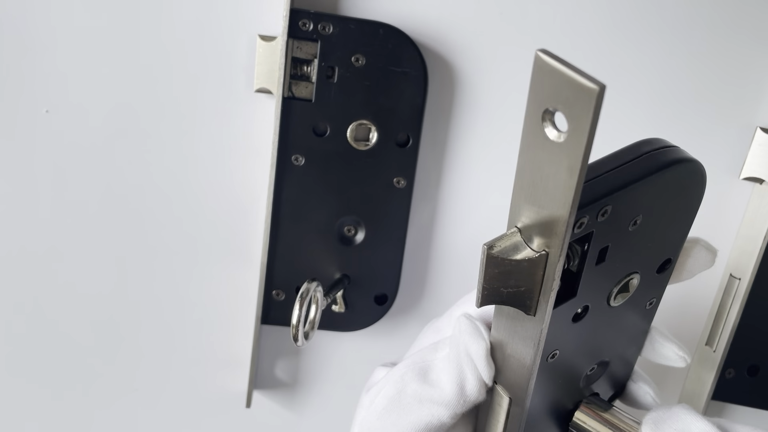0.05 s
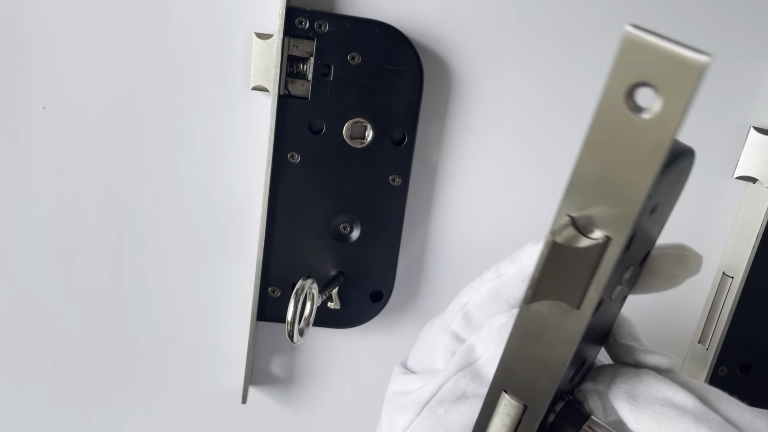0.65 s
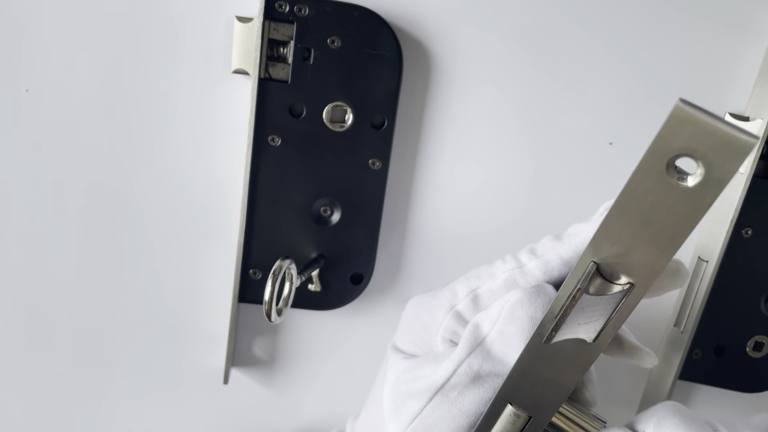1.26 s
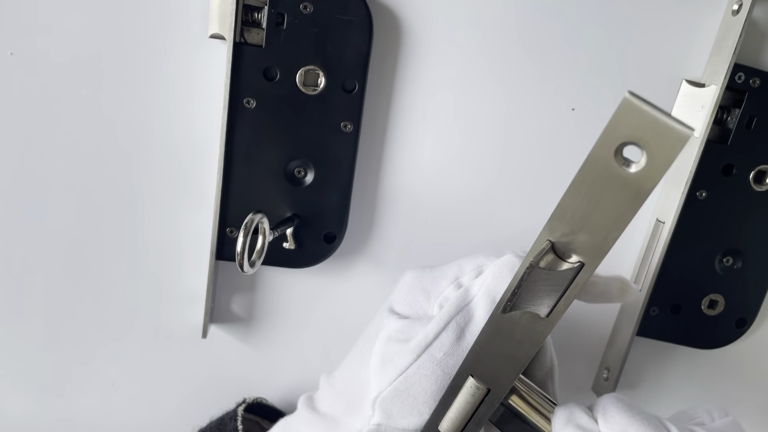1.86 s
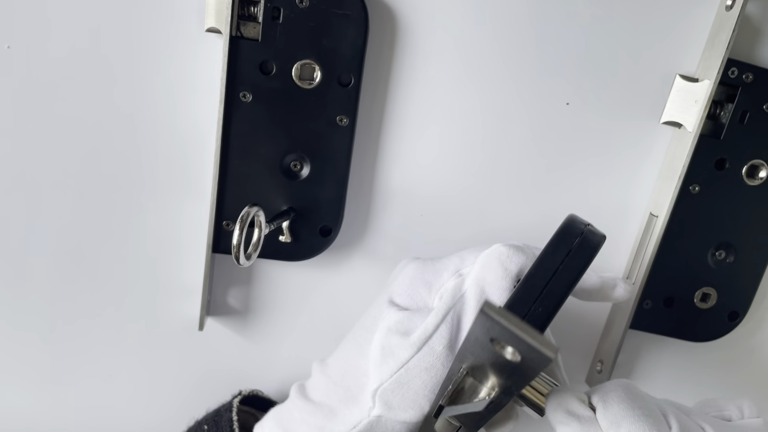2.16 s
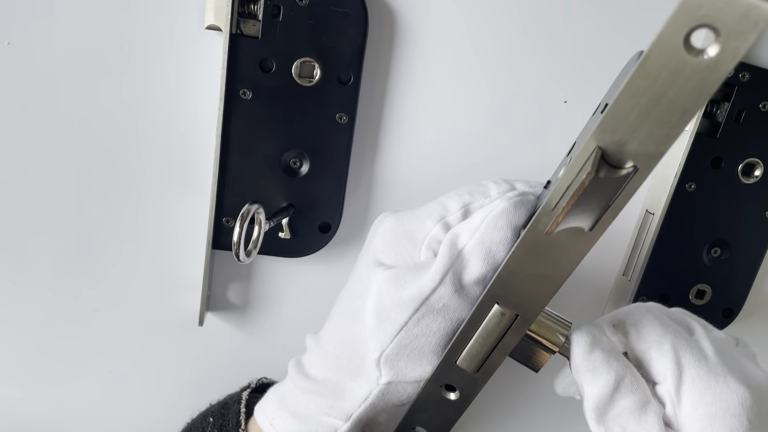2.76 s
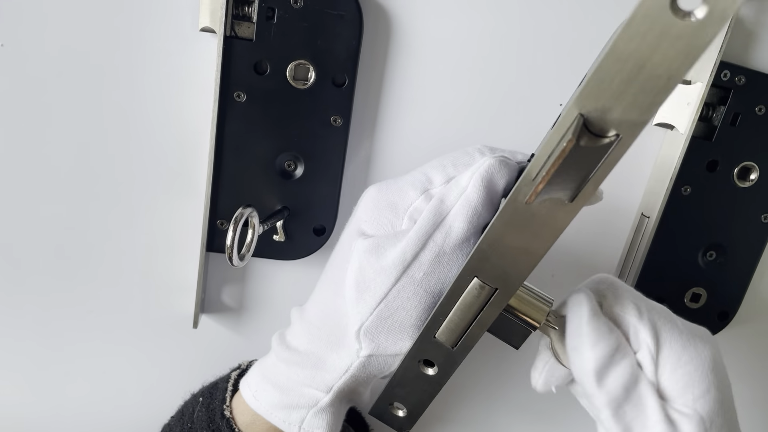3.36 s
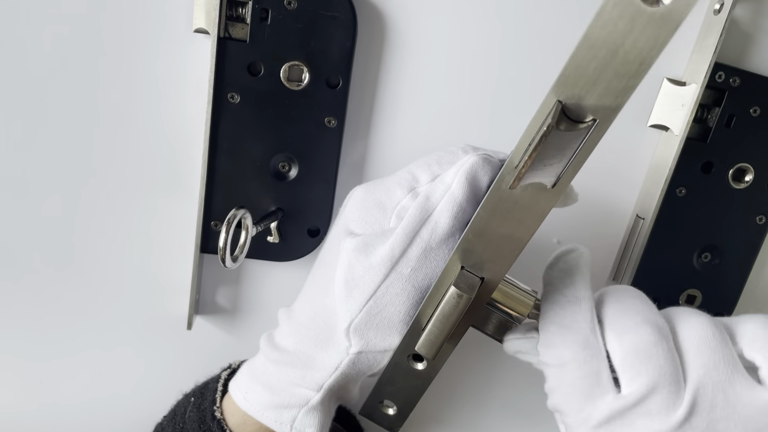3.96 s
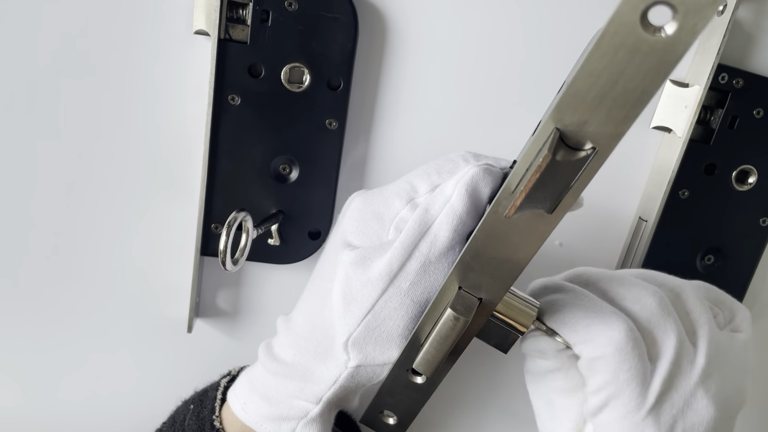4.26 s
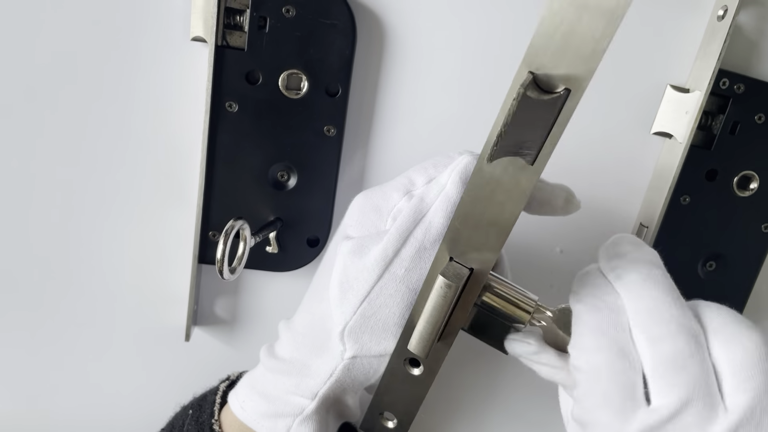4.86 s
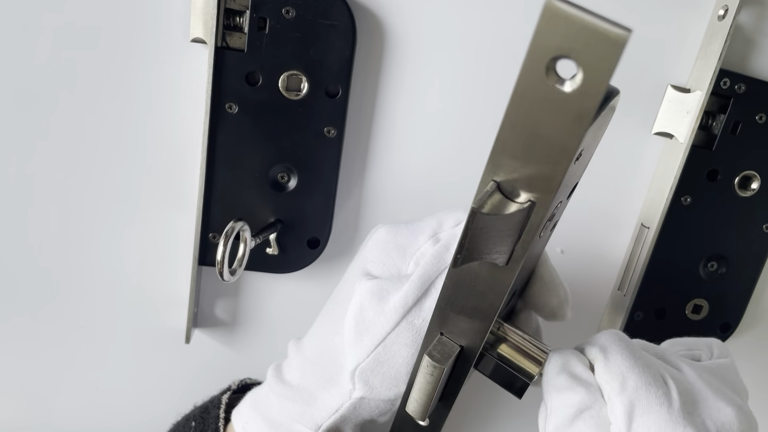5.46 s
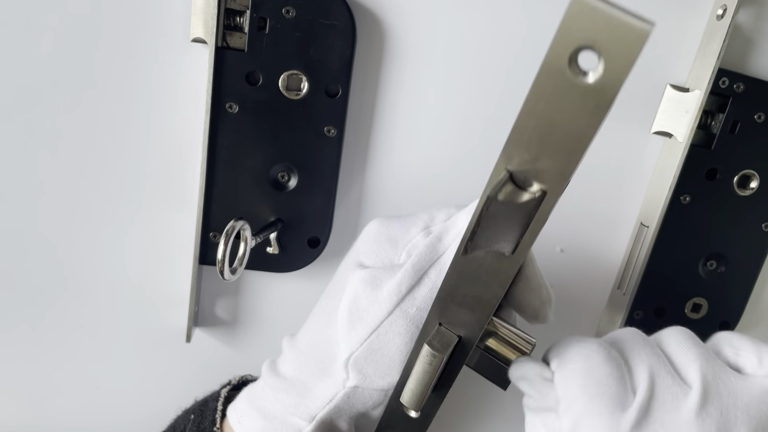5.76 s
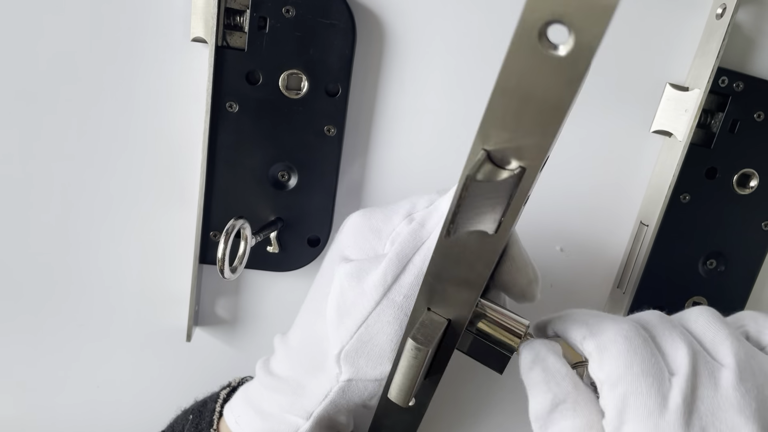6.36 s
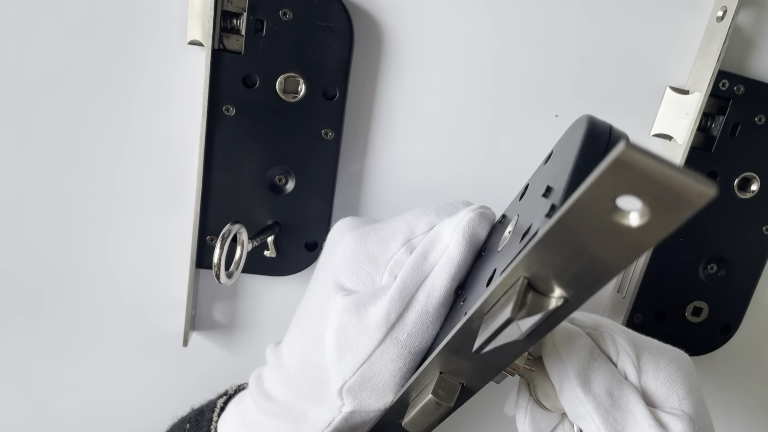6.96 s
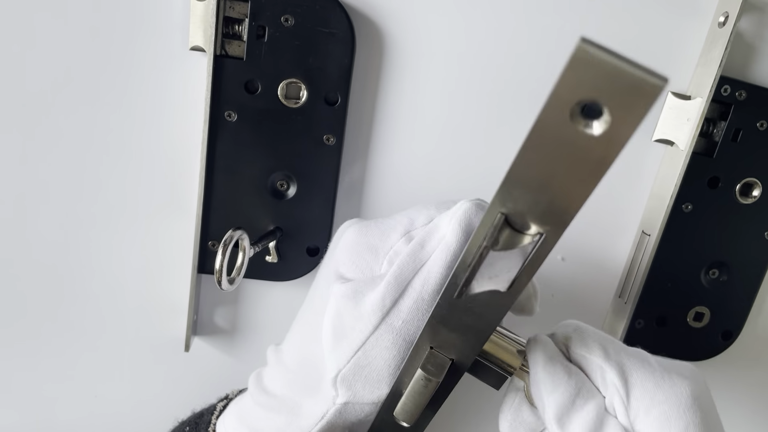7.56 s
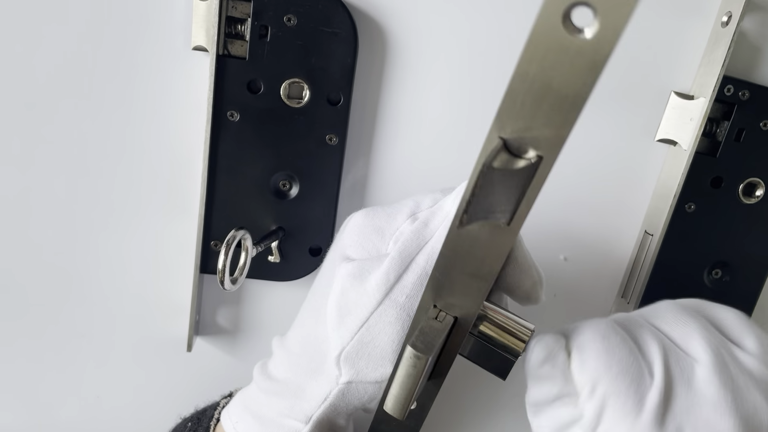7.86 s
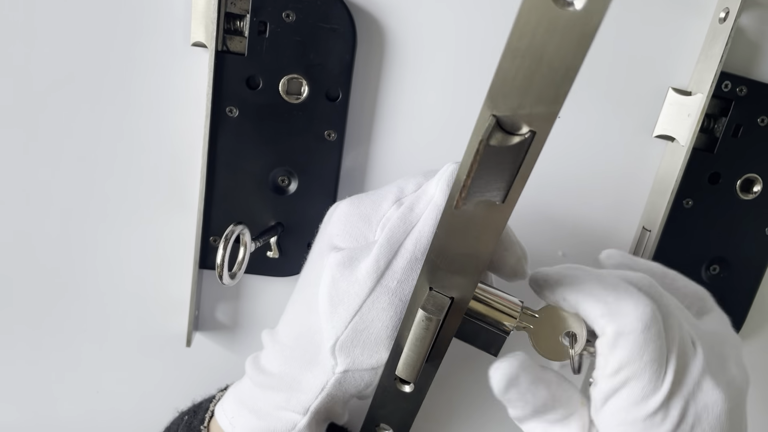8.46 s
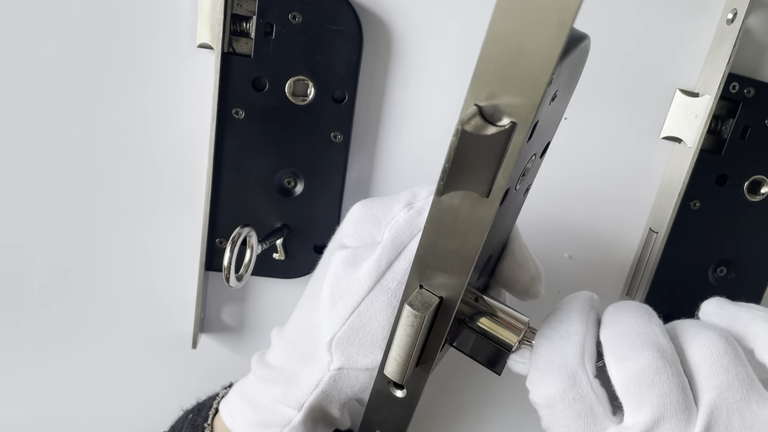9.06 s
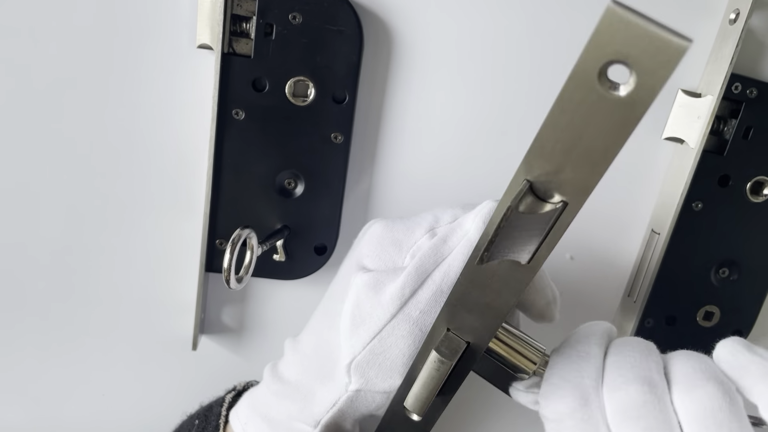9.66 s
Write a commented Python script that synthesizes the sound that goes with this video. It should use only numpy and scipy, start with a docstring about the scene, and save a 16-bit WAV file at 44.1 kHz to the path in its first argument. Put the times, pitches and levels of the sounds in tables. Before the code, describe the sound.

A key turns back and forth in a steel door lock, with sharp bolt clacks, lever ticks, small key jingles and glove rustle.

```python
"""Over a low room rumble, a faint hum and a sinking drone, cotton gloves rub on a steel door lock.
The lock clicks and clacks as a key is fitted, and the spare keys jingle against each other.
The key turns back and forth: metal scrapes, levers tick, the bolt slams into its stop and the case
rings. Some slams also knock dully through the table. The table and the small room add echoes."""
import sys
import numpy as np
from scipy import signal
from scipy.fft import rfft, irfft, next_fast_len
from scipy.io import wavfile
from scipy.ndimage import uniform_filter1d

SR = 44100
rng = np.random.default_rng(int(sys.argv[2]) if len(sys.argv) > 2 else 0)


def generate_wav(sig):
    """Save sig (samples, or channels by samples) to the path in sys.argv[1] as 16-bit PCM at SR."""
    pcm = np.round(np.clip(np.atleast_2d(sig).T, -1, 1) * 32767).astype(np.int16)
    wavfile.write(sys.argv[1], SR, pcm)


N = 428211
TIME = np.arange(N) / SR

# Levels in the tables are relative. A "colour" says how strong each pitch is, from bass to treble.
# The room's rumble. Each row: pitch in Hz, level in dB.
RUMBLE_COLOUR = [(20, -18.5), (32, -12), (48, 5), (100, 0), (140, 3), (235, -6.5), (285, -10), (600, -13.5),
                 (1000, -11), (1600, -20), (4000, -44), (15000, -46.5)]
# The tones of the hum. Each row: pitch in Hz, level in dB.
HUM_TONES = [(98, -55.5), (181, -60.5), (242, -62.5)]
# A low drone that sinks and fades. Each row: time in seconds, pitch in Hz, level in dB.
DRONE_PATH = [(0, 245, -52), (1.3, 225, -53.5), (1.998, 218, -50), (2.6, 205, -49.5), (2.9, 180, -53),
              (3.3, 175, -69.5)]
# Gloves slide at each change of grip. Each row: start and end in seconds, level in dB.
GLOVE_RUBS = [(0, 0.025, -47), (0.477, 0.794, -56.5), (1.3, 1.533, -63.5), (1.657, 1.796, -69),
              (1.92, 2.233, -58), (2.262, 2.477, -58), (2.515, 2.697, -62), (3.976, 4.387, -58.5),
              (4.542, 4.638, -52.5), (4.703, 4.824, -75), (5.017, 5.059, -66), (5.26, 5.328, -78.5),
              (5.434, 5.545, -65), (5.644, 5.91, -58.5), (6.2, 6.423, -66), (6.7, 7.654, -53.5),
              (7.995, 8.282, -56.5), (8.457, 8.61, -50), (9.23, 9.71, -54.5)]
# The hiss of cloth on steel. Each row: pitch in Hz, level in dB.
GLOVE_COLOUR = [(400, -9), (1000, -15), (1550, 1), (1900, -2.5), (4200, 1), (7000, -0.5), (10500, 1.5),
                (13500, 1.5), (15200, -23)]
# Light clicks as the key seats and loose parts shift. Each row: start in seconds, then level,
# ring of the lock's front plate and brightness, all in dB.
LIGHT_CLICKS = [(0.208, -27.5, 1, -6), (0.2636, -28, -1, -11), (0.298, -24, 4.5, -10.5),
                (0.314, -20.5, 0, 0.5), (0.674, -52.5, 26, -3), (0.791, -37, 0, 14), (0.868, -36, 8.5, -8),
                (0.911, -49, 4, 2), (1.2641, -29, 3, 3), (1.363, -52, 11, -11), (1.681, -40.5, -4, -6.5),
                (1.862, -45.5, 6, -2), (1.966, -37.5, -5, 0), (1.992, -40, 14, 3), (2.031, -39, 4, -1),
                (2.15, -32, 1, 4.5), (2.346, -42.5, 5, -2), (2.479, -38, 0.5, -8.5), (2.564, -25, 3, -3),
                (2.659, -46, 14, 0), (3.039, -32, -6, -5), (3.066, -29.5, -1, -4), (3.345, -35.5, 5, -2),
                (3.383, -30, 10, 14), (3.764, -27, -2, 0), (4.097, -34.5, 0, -9), (4.309, -29, -3, -2.5),
                (4.39, -46.5, 4, 9), (4.44, -33.5, -7.5, 2), (4.563, -38, -11, 4.5), (4.66, -27.5, -9.5, 1),
                (4.672, -33.5, 0, -1), (5.03, -47.5, 10.5, 6), (5.451, -46, 7, -2),
                (5.481, -41.5, 13.5, -9), (5.496, -36, 3.5, -11), (5.551, -38.5, 14.5, -7),
                (5.698, -26, -4, 8), (5.725, -39.5, 16, -2), (5.834, -38.5, 1, 1.5), (5.874, -30, -4.5, -3),
                (5.929, -39, 10.5, -1.5), (6.045, -28, 1, 1.5), (6.232, -37.5, 6.5, 3.5),
                (6.356, -32, -6, 4), (6.372, -37.5, 6, 4), (6.799, -27.5, -3, 10), (7.106, -22.5, -9, 9),
                (7.14, -29.5, 1, -9), (7.163, -28.5, 10.5, 8), (7.4, -25, -3.5, 5), (7.955, -23.5, 10, 4),
                (8.227, -30, 3.5, 1), (8.583, -33, 2, -4), (8.738, -19.5, 0.5, 4), (9.263, -28, -6.5, 3.5),
                (9.361, -23, 3, 11.5), (9.515, -32.5, 0, -4)]
# Heavy blows of bolt and case. Each row: start in seconds, then level, plate ring, brightness and
# thud in dB, then length of the chatter in seconds.
HEAVY_BLOWS = [(0.2804, -15, 7.5, 2.5, 9.5, 0.0054), (0.3516, -21, -6, -7, 9.5, 0.0046),
               (0.358, -22, 6, -8, 0, 0.0036), (0.6122, -23.5, -0.5, -1.5, -0.5, .012),
               (2.923, -18, -8, 4.5, -11, .0067), (2.947, -13, 12.5, 3, -24.5, 0.0061),
               (2.9593, -26, 11, 8.5, -8, 0.0085), (3.216, -12.5, 2, 2, -5.5, 0.0041),
               (3.416, -13.5, 4, 6.5, -6.5, 0.0061), (3.651, -12.5, -0.5, -.5, -3.5, 0.0041),
               (3.657, -24, 8, 5, -10.5, 0.0064), (3.827, -16, 4, 8, -10.5, 0.0064),
               (5.752, -19, 7.5, 3, 6, 0.0059), (6.492, -12.5, 0.5, 7, -6.5, 0.006),
               (6.898, -14.5, -4.5, 3.5, -13.5, 0.0026), (7.172, -13, -0.5, 5.5, -4, .0061),
               (7.631, -13, 3.5, 4.5, -4.5, 0.0067), (7.941, -17.5, 2.5, 7.5, -5.5, 0.004),
               (8.968, -11, -4.5, 3.5, -9, .009), (9.345, -14.5, 5, 5, -1, .0043),
               (9.566, -14, 2.5, 5.5, -4, 0.0053)]
# The lock's many crowded notes, damped by the hand. Each row: pitch in Hz, level in dB.
LOCK_COLOUR = [(100, -13.5), (200, -19.5), (380, -21.5), (520, -10), (900, -12), (1300, -7.5), (1900, -3.5),
               (3000, 0), (4300, 5), (5500, 0.5), (8500, -3), (12500, -5), (14300, -7.5), (16000, -37)]
# Notes of plate and case that ring on. Each row: pitch in Hz, level in dB, seconds to fade by 60 dB.
LOCK_NOTES = [(515.6, -31.5, 0.037), (1225, -33.5, 0.036), (1495, -20.5, 0.13), (1576, -19, 0.035),
              (1997, -30.5, 0.044), (2160, -25, 0.081), (2966, -22.5, 0.099), (3075, -18.5, 0.031),
              (3770, -22.5, 0.033), (4220, -23, 0.03), (4490, -22, .035), (5970, -21, 0.015),
              (6210, -19, 0.03), (8050, -23.5, 0.02), (10000, -23.5, 0.025)]
# The spare keys jostle. Each row: start and length in seconds, level in dB, bending note's share in dB.
JINGLES = [(0.608, 0.039, -42, -21), (0.747, 0.054, -48, -18), (0.97, 0.014, -44.5, -26),
           (1.138, .013, -45, -17), (2.582, 0.024, -47.5, -20), (3.132, 0.012, -30, -19.5),
           (3.976, 0.037, -39, -9), (4.027, 0.013, -40, -17), (4.096, .02, -28, -33),
           (4.19, 0.01, -34.5, -20), (4.939, 0.012, -50.5, -32), (6.229, 0.043, -46, -14),
           (6.444, 0.029, -40, -20), (6.723, 0.011, -32.5, 3), (6.746, 0.021, -35, -7),
           (7.07, 0.078, -56, -19), (7.826, 0.012, -38, -20.5), (8.254, 0.045, -43.5, -21),
           (8.415, 0.032, -42, -17), (8.52, 0.041, -36, -30), (8.862, 0.0075, -44, -14),
           (9.412, .023, -44.5, -20)]
# High notes of the spare keys. Each row: pitch in Hz, level in dB, seconds to fade by 60 dB.
KEY_NOTES = [(6600, -7, .08), (6660, -7.5, 0.078), (7650, -9.5, 0.14), (7830, -6, 0.078),
             (7800, -12.5, .06), (11170, -4.5, 0.061), (11250, -5.5, 0.078), (12500, -4.5, .06),
             (12400, 0, 0.077), (13100, -3.5, 0.0417)]
# The longest key's bending note. One row: pitch in Hz, level in dB, seconds to fade by 60 dB.
KEY_BENDING_NOTE = [(2230, -4, 0.071)]
# Turns of the key. Each row: start and end in seconds, scrape level in dB, number of ticks, first gap
# in seconds, then first tick's level, change per tick, plate ring and brightness, all in dB.
KEY_TURNS = [(2.913, 2.979, -30.5, 2, 0.02, -25, 5, -8, -7),
             (3.162, 3.213, -33, 4, .016, -26.5, 1.5, 4, 6.5),
             (3.368, 3.411, -35, 2, 0.023, -25.5, 7, 0, 0.5),
             (3.587, 3.68, -40, 5, 0.011, -21.5, -1.5, 3.5, 6),
             (3.795, 3.83, -33, 2, 0.013, -20, -20, -1, 11.5),
             (4.155, 4.228, -49.5, 3, 0.042, -31.5, -4, -0.5, 9),
             (4.587, 4.611, -44, 2, 0.015, -40.5, 13, -4, 5),
             (6.256, 6.274, -52, 2, .007, -37.5, -2.5, 1, 6), (6.448, 6.52, -55, 2, .026, -36, 0, 0, 10),
             (6.852, 6.892, -39.5, 3, .01, -24.5, -1.5, -5, 8),
             (7.429, 7.476, -40.5, 3, 0.019, -22.5, -4, 3, 8),
             (7.526, 7.57, -53, 2, 0.036, -19.5, -12.5, 4.5, 3),
             (7.883, 7.969, -39.5, 3, .018, -22.5, -1.5, -5, 7.5),
             (8.252, 8.282, -44, 3, 0.02, -41.5, 0.5, -12, 14.5),
             (8.657, 8.744, -41, 5, 0.019, -25.5, -1, 3, 9.5),
             (8.921, 8.989, -40.5, 2, 0.028, -32.5, 13, -1, 6),
             (9.314, 9.376, -38, 2, 0.024, -21, -17, -10, 10.5),
             (9.534, 9.561, -35, 2, 0.0084, -28, 3, 0, 7)]
# The bolt's recoil knocks through hand and table. Each entry: start in seconds.
KNOCK_TIMES = [3.829, 6.495, 6.899, 7.174, 7.944, 8.969]
# Low notes of the table. Each row: pitch in Hz, level in dB, seconds to fade by 60 dB.
TABLE_NOTES = [(85, -3, .07), (133, -4, 0.069), (205, -5, .045), (319, -18.5, 0.013)]
# The room's echoes. Each row: pitch in Hz, level in dB.
ROOM_COLOUR = [(200, -6), (1000, -4), (2200, 8), (3300, 4.5), (6000, -1.5), (13000, -3), (15000, -14.5)]
# How alike left and right are in echoes and rumble. Each row: pitch in Hz, likeness from -1 to 1.
STEREO_LIKENESS = [(60, .99), (130, 1), (260, .8), (600, -0.14), (1500, -0.36), (5000, 0.22), (12000, -1)]
# The left microphone against the right. Each row: pitch in Hz, phase lead in radians, level in dB.
LEFT_VS_RIGHT = [(200, 0, -1), (950, -.5, 0), (1500, .5, 3), (2050, .2, 1), (2600, 1, 1), (3600, .1, -1),
                 (5000, -.05, 0), (6500, .9, 0), (10000, 1.6, 0), (13000, 2.3, 0)]


def from_db(db):
    """Turn decibels into a number to multiply by."""
    return 10 ** (np.asarray(db) / 20)


def unit_level(x):
    """Scale a signal to an average strength (rms) of 1."""
    return x / np.sqrt(np.mean(x ** 2) + 1e-20)


def at_hz(points, hz):
    """Read between a table's rows, with octaves evenly spaced."""
    pitches, values = np.transpose(points)
    return np.interp(np.log(np.maximum(hz, 1)), np.log(pitches), values)


def bin_hz(size):
    """The pitches in a spectrum of this many samples."""
    return np.arange(size // 2 + 1) * SR / size


def add(track, start_s, piece):
    """Mix a short sound into a track."""
    start = max(round(start_s * SR), 0)
    track[..., start:start + piece.shape[-1]] += piece[..., :max(N - start, 0)]


def drift(per_s):
    """A random wander of strength 1 that changes course per_s times a second."""
    points = rng.standard_normal(int(N / SR * per_s) + 2)
    return unit_level(np.interp(TIME * per_s, np.arange(len(points)), points))


def coloured(x, colour, size=4096):
    """Give a sound a colour without smearing it earlier in time (a minimum-phase filter)."""
    cepstrum = irfft(np.log(from_db(at_hz(colour, bin_hz(size)))))
    cepstrum[1:size // 2] *= 2
    cepstrum[size // 2 + 1:] = 0
    response = irfft(np.exp(rfft(cepstrum)))
    return signal.fftconvolve(x, response)[:len(x)]


def ring(force, notes):
    """A push makes an object ring at its own notes, each fading at its own speed."""
    out = 0
    for hz, db, fade_s in notes:
        decay = np.exp(-np.log(1000) / (fade_s * SR))
        feedback = decay * np.cos(2 * np.pi * hz / SR)
        note = signal.lfilter([1, -feedback], [1, -2 * feedback, decay ** 2], force + 1e-18)
        out = out + from_db(db) * np.sqrt(2 * (1 - decay ** 2)) * note
    return out


def struck(force, notes, vary_db):
    """The point of contact wanders, so each touch rings a new mix of the notes."""
    return sum(ring(force * from_db(vary_db * np.clip(drift(25), -1.5, 1.5)), [note]) for note in notes)


def friction(per_s, spread_db):
    """Rubbing surfaces make tiny slips of uneven size at random moments."""
    sizes = from_db(spread_db * np.minimum(rng.exponential(1, N), 4))
    slips = rng.random(N) < per_s / SR
    return unit_level(slips * sizes * rng.standard_normal(N))


def surrounding_noise(colour, size):
    """Stereo noise from all sides; left and right are alike in the bass."""
    hz = bin_hz(size)
    alike = np.clip(at_hz(STEREO_LIKENESS, hz), -1, 1)
    mid, side = rfft(rng.standard_normal((2, size))) * from_db(at_hz(colour, hz))
    spectrum = np.sqrt(1 + alike) * mid + np.sqrt(1 - alike) * side * [[1], [-1]]
    return unit_level(irfft(spectrum, size))


def background(rumble_db=-50, drone_width_hz=25):
    """The room rumbles, a hum wavers, and a narrow band of noise sinks as a drone."""
    hum = 0
    for hz, db in HUM_TONES:
        swell = 1 + .5 * drift(4)
        hum = hum + from_db(db) * unit_level(swell * np.sin(2 * np.pi * hz * TIME + .89 * drift(3.7)))
    times, hz, db = np.transpose(DRONE_PATH)
    phase = 2 * np.pi * np.cumsum(np.interp(TIME, times, hz)) / SR
    band = drift(2 * drone_width_hz) * np.sin(phase) + drift(2 * drone_width_hz) * np.cos(phase)
    drone = from_db(np.interp(TIME, times, db)) * unit_level(band)
    rumble = from_db(rumble_db) * surrounding_noise(RUMBLE_COLOUR, next_fast_len(N))[:, :N]
    return rumble + hum + drone


def rub_strength(glide_s=.017, resting_db=-71.5):
    """Each change of grip swells, holds and sinks back to a resting hold."""
    push = sum(from_db(db) * ((TIME > start) & (TIME < end)) for start, end, db in GLOVE_RUBS)
    decay = np.exp(-1 / (glide_s * SR))
    return signal.lfilter([1 - decay], [1, -decay], push + from_db(resting_db))


def gloves(unsteady_db=2, grit_db=-5, parts=14):
    """Cloth hisses over the metal, and loose parts tick faintly, each at its own pitch."""
    hiss = unit_level(coloured(friction(per_s=5800, spread_db=2.5), GLOVE_COLOUR))
    slips = friction(per_s=130, spread_db=2.5)
    which_part = rng.integers(0, parts, N)
    pitches = np.geomspace(1500, 11500, parts)
    grit = sum(ring(slips * (which_part == k), [(hz, 0, 25 / hz)]) for k, hz in enumerate(pitches))
    cloth = hiss + from_db(grit_db) * unit_level(grit)
    return cloth * rub_strength() * from_db(unsteady_db * drift(30))


def rattles(per_s=10, boost_db=6, spread_db=3, plate_db=11):
    """Loose parts tap the plate at random, louder when the gloves rub; rows as in LIGHT_CLICKS."""
    moments = np.flatnonzero(rng.random(N) < per_s / SR)
    rub_db = 20 * np.log10(rub_strength()[moments])
    levels = rub_db + boost_db + spread_db * rng.standard_normal(N)[moments]
    return [(i / SR, db, plate_db, 0) for i, db in zip(moments, levels)]


def chatter(length_s, colour, lead_s, rise_s=.00039, fade_s=.0011, graze_s=.005, size=1800):
    """Steel parts graze softly, then meet after lead_s in a flurry of tiny impacts."""
    t = np.arange(size) / SR - lead_s
    swell = .5 + .5 * np.tanh((t - rise_s) / rise_s)
    fade = np.exp(-np.maximum(t - .91 * length_s, 0) / fade_s)
    graze = from_db(-22) * np.exp(-np.abs(t) / graze_s)
    lumps = unit_level(uniform_filter1d(rng.standard_normal(size), size=25))
    spectrum = rfft(rng.standard_normal(size) * (swell * fade + graze) * from_db(-lumps))
    # Hard hits spread their energy evenly; the place of contact then colours it.
    even = spectrum / np.sqrt(uniform_filter1d(np.abs(spectrum) ** 2, size=41))
    return irfft(even * from_db(at_hz(colour, bin_hz(size)))) * np.sqrt(.005 * SR)


def steel_hits(heavy_db=-1, light_db=-5, click_thud_db=-3, click_s=.0033, lead_s=.008):
    """The force of all blows and clicks; where and how hard the parts meet sets each one's colour."""
    hits = [(start, db + heavy_db, *rest) for start, db, *rest in HEAVY_BLOWS]
    for start, db, plate, bright in [*LIGHT_CLICKS, *lever_ticks(), *rattles()]:
        hits.append((start, db + light_db, plate, bright, click_thud_db, click_s))
    force = np.zeros(N)
    for start, db, plate, bright, thud, length_s in hits:
        colour = [(750, thud), (1300, plate), (1750, plate), (2700, 0), (5200, 0), (7200, bright)]
        add(force, start - lead_s, from_db(db) * chatter(length_s, colour, lead_s))
    return force


def lock(drive_db=7, ring_db=-4):
    """Hits and scraping shake the case and front plate, which clack and ring on."""
    force = from_db(drive_db) * (steel_hits() + bolt_scrape())
    return coloured(force, LOCK_COLOUR) + from_db(ring_db) * struck(force, LOCK_NOTES, vary_db=4)


def spare_keys(level_db=-2, clink_db=-5, touches_per_s=5000):
    """Small keys touch many times in quick succession and ring."""
    edge_force, bend_force = np.zeros((2, N))
    for start, length_s, db, bending_db in JINGLES:
        size = int(length_s * SR) + 1
        touches = unit_level(rng.standard_normal(size) * (rng.random(size) < touches_per_s / SR))
        add(edge_force, start, from_db(db) * touches)
        add(bend_force, start, from_db(db + bending_db) * touches)
    clink_colour = [(1500, -21.5), (5000, -8), (7000, -3), (9500, 0), (12500, 2.5), (15500, -17.5)]
    clink = from_db(clink_db) * coloured(edge_force, clink_colour)
    ringing = struck(edge_force, KEY_NOTES, vary_db=3.5) + ring(bend_force, KEY_BENDING_NOTE)
    return from_db(level_db) * (ringing + clink)


def bolt_scrape(unsteady_db=2.2):
    """The bolt and levers scrape along their guides while the key turns."""
    push = sum(from_db(db) * ((TIME > start) & (TIME < end)) for start, end, db, *_ in KEY_TURNS)
    pressure = uniform_filter1d(push, size=200)
    return pressure * friction(per_s=4000, spread_db=3) * from_db(unsteady_db * drift(250))


def lever_ticks(gap_shrink=.88):
    """Levers tick over faster and faster as the key gathers speed; rows as in LIGHT_CLICKS."""
    ticks = []
    for start, _, _, count, gap_s, db, change_db, plate, bright in KEY_TURNS:
        for k in range(round(count)):
            ticks.append((start, db + k * change_db, plate, bright))
            start += gap_s * gap_shrink ** k
    return ticks


def table_knocks(push_db=-67.5):
    """The bolt's recoil gives the table a short push that sets its low notes going."""
    push = from_db(push_db) * signal.windows.hann(44) * np.sqrt(.005 * SR)
    force = np.zeros(N)
    for start in KNOCK_TIMES:
        add(force, start, push)
    return ring(force, TABLE_NOTES)


def echoes(x, delay_s, fade_s, level_db, colour, size=32768):
    """A cloud of fading echoes; it shifts between three patterns as the lock is moved about."""
    t = np.arange(size) / SR - delay_s
    fade = (t > 0) * np.exp(-np.log(1000) * np.abs(t) / fade_s)
    shares = np.array([drift(5) for _ in range(3)])
    out = 0
    for share in shares / np.sqrt(np.sum(shares ** 2, axis=0)):
        tail = surrounding_noise(colour, size) * fade
        tail /= np.sqrt(np.sum(tail ** 2) / 2)
        out = out + signal.fftconvolve([x * share], tail, axes=1)[:, :N]
    return from_db(level_db) * out


def microphones(x, size=512):
    """Left and right each hear the close sound with their own timing (phase) and level."""
    hz, phase, db = np.transpose(LEFT_VS_RIGHT)
    sides = np.array([[.5], [-.5]])
    shift = np.exp(1j * sides * at_hz(np.c_[hz, phase], bin_hz(size)))
    gain = from_db(sides * at_hz(np.c_[hz, db], bin_hz(size)))
    response = np.roll(irfft(shift * gain), size // 2, axis=1) * signal.windows.hann(size, sym=False)
    return signal.fftconvolve([x], response, axes=1)[:, size // 2:size // 2 + N]


def scene():
    """Lock, keys and gloves close by, with echoes from table and room, over the background."""
    close = lock() + table_knocks() + spare_keys() + gloves()
    table_colour = [(300, 6.5), (4000, 6), (7000, -2), (13000, 2.5), (15500, -6.5)]
    table = echoes(close, delay_s=.0031, fade_s=.085, level_db=-9.5, colour=table_colour)
    room = echoes(close, delay_s=.007, fade_s=.71, level_db=-20, colour=ROOM_COLOUR)
    return microphones(close) + table + room + background()


def record(dry):
    """Round off the loudest peaks and cut the treble above 16300 Hz."""
    rounded = .92 * np.tanh(dry / 1.341)
    return signal.sosfilt(signal.ellip(10, .2, 80, 16300, fs=SR, output="sos"), rounded)


dry = scene()
out = record(dry)
generate_wav(out)
```